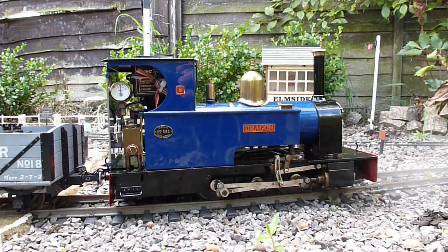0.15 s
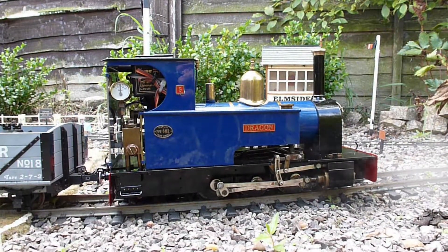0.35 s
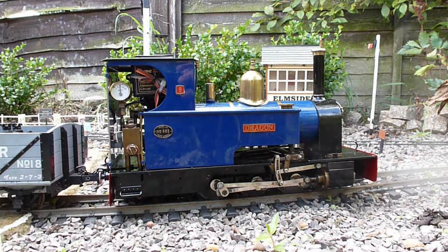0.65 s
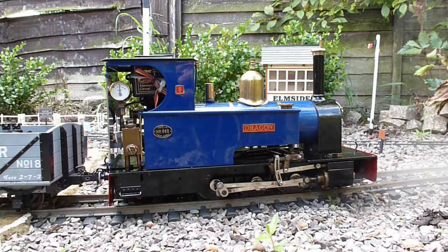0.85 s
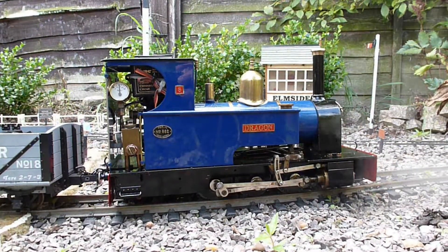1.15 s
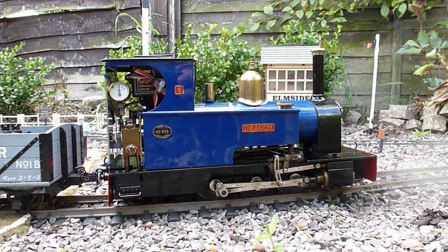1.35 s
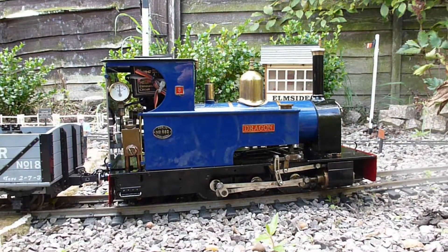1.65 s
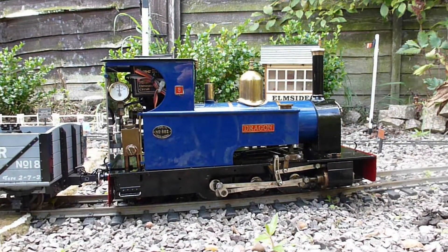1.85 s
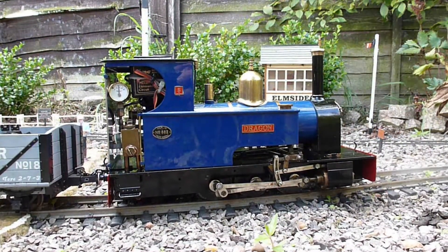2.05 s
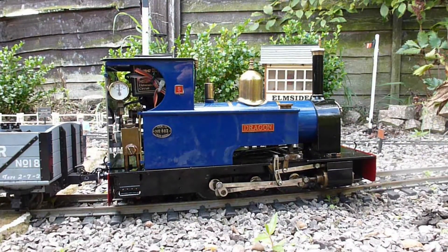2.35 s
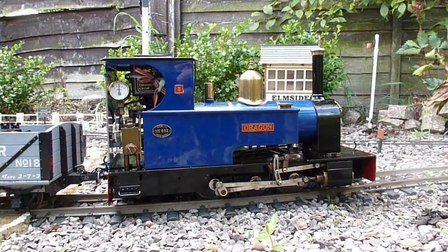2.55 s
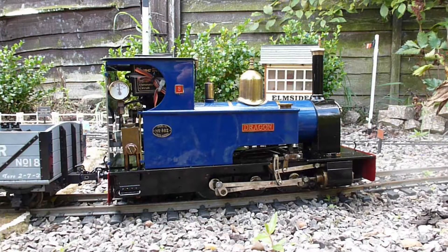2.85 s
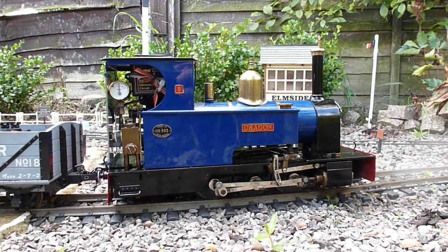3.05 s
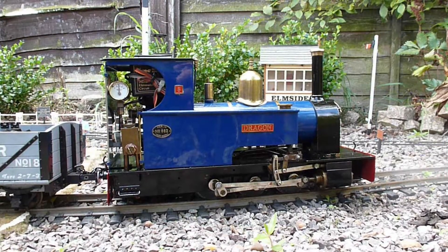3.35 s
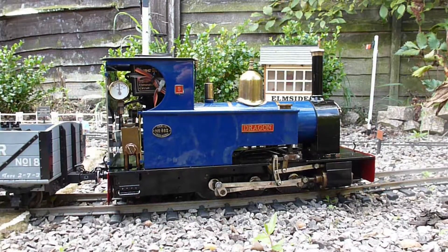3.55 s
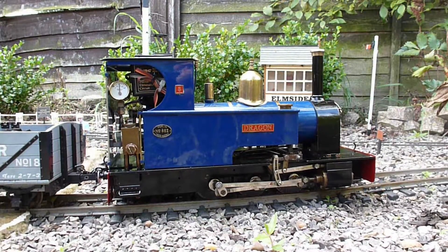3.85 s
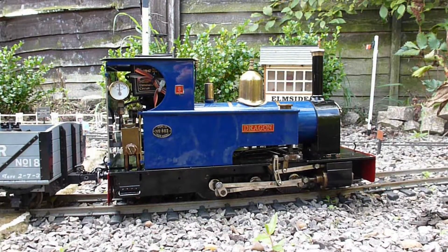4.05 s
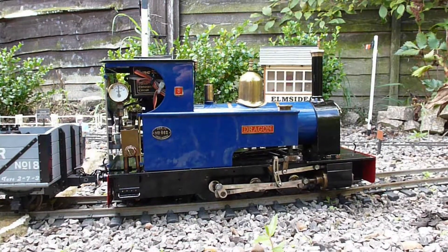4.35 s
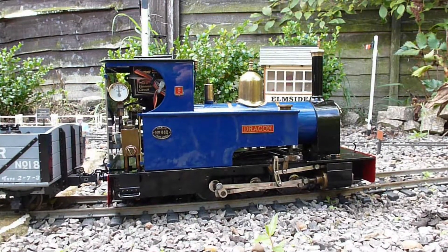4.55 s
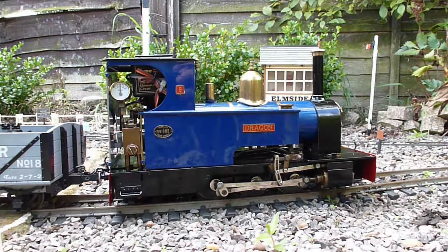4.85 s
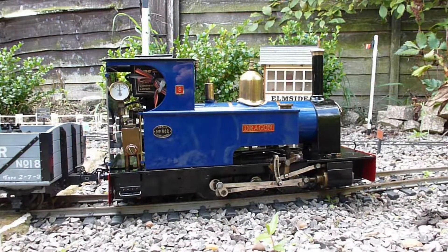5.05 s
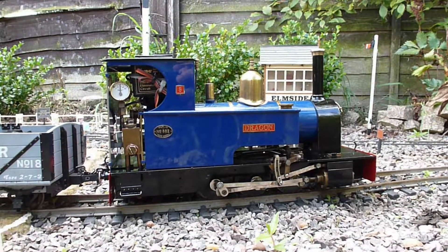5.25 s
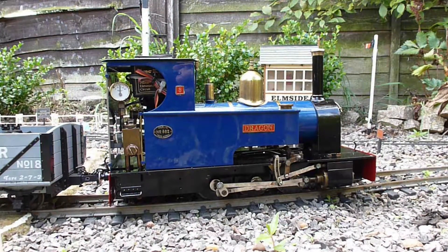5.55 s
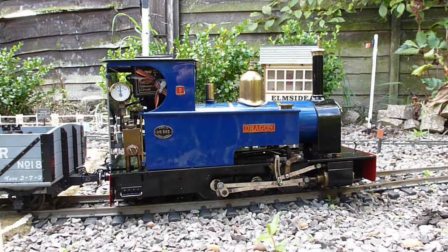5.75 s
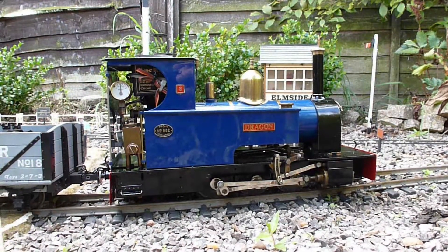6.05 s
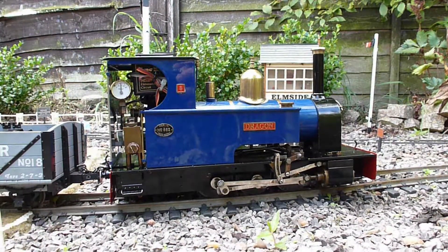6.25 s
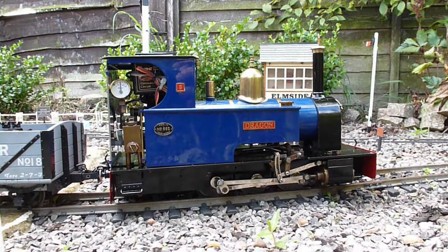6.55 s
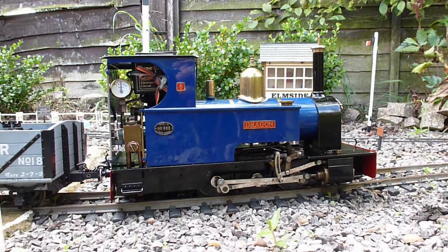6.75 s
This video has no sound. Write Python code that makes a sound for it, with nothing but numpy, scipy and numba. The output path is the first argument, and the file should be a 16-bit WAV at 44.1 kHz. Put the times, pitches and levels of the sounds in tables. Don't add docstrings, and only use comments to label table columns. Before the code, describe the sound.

Close, dry outdoor sound with faint early reflections from gravel and fence. A piercing small steam whistle opens harsh and airy, steadies briefly, weakens into an unsteady wet note, surges once more and shuts abruptly. Couplings knock twice. The burner's hollow rumble and bright leaking steam then rise as the camera adjusts, with water crackling and spitting on hot metal. A gentle steam puff swells near five seconds, the hiss later eases, and light mechanical ticks begin.

```python
import sys
import numpy as np
from scipy import signal
from scipy.fft import rfft, irfft
from scipy.io import wavfile
from scipy.ndimage import uniform_filter1d
from numba import njit

SR = 44100
rng = np.random.default_rng(int(sys.argv[2]) if len(sys.argv) > 2 else 0)


def put_to_file(sound):
    columns = np.atleast_2d(sound).T
    safe = np.clip(columns, -1, 1)
    whole_steps = np.round(safe * 32767)
    wavfile.write(sys.argv[1], SR, whole_steps.astype(np.int16))


def gain_from_db(level_db):
    decades = np.asarray(level_db, float) / 20
    return 10 ** decades


N = 304290
T = np.arange(N) / SR

BURNER_DB = -32


def noise():
    return rng.standard_normal(N)


def set_rms(x, db):
    return x * gain_from_db(db) / np.sqrt(np.mean(x ** 2))


def curve(rows):
    time_s, *columns = np.transpose(rows)
    return [uniform_filter1d(np.interp(T, time_s, column), size=200) for column in columns]


def gate(start, end, rise, fall):
    return np.clip(np.minimum((T - start) / rise, (end - T) / fall), 0, 1)


def walk(rate):
    hold = int(SR / rate)
    steps = np.repeat(rng.standard_normal(N // hold + 1), hold)
    return 1.3 * uniform_filter1d(uniform_filter1d(steps, hold), hold)[:N]


def colour(x, points):
    hz, db = np.transpose(points)
    bins = np.maximum(np.arange(N // 2 + 1) * SR / N, 1)
    return irfft(rfft(x) * gain_from_db(np.interp(np.log(bins), np.log(hz), db)), N)


@njit
def svf(x, hz, width):
    y = np.empty(len(x))
    band, low = 0., 0.
    g, damping, last_hz = 0., 0., 0.
    for i in range(len(x)):
        if hz[i] != last_hz:
            g, damping, last_hz = np.tan(np.pi * hz[i] / SR), width / hz[i], hz[i]
        v = (band + g * (x[i] - low)) / (1 + g * (g + damping))
        band = 2 * v - band
        low = low + 2 * g * v
        y[i] = damping * v
    return y


def band_pass(x, hz, width):
    return svf(x, hz + 0 * T, 1. * width)


def resonant(hiss, peaks, flicker_db):
    out = hiss
    for hz, width, db in peaks:
        out = out + gain_from_db(db + 15 + flicker_db * walk(12)) * band_pass(hiss, hz, width)
    return out


def ring(hz, t60, length=.1):
    t = np.arange(int(length * SR)) / SR
    blow = 1 - np.exp(-t / .0003)
    return -np.sin(2 * np.pi * hz * t) * blow * 1000 ** (-t / t60)


def add(out, s, wave):
    i = int(s * SR)
    out[i:i + len(wave)] += wave[:N - i]


def camera_gain_db():
    # start_s, level_db
    gain = [(0, -12), (.78, -12.5), (.86, -15), (.96, -14.5), (1.05, -6.5), (1.45, -4.5), (1.73, -8),
            (1.85, -6), (1.92, -10), (2.07, -11), (2.22, -9), (2.7, -7.5), (2.78, -13), (2.995, -13),
            (3.02, -10.5), (3.46, -4), (4.83, -.6), (6.9, .1)]
    return curve(gain)[0]


def burner():
    # pitch_hz, level_db (per Hz)
    flame_colour = [(15, -64.5), (25, -26), (74, -15.5), (134, -11.5), (193, -11.5), (283, -10.5),
                    (630, -8), (707, -9), (906, 4.5), (1040, -7), (1410, -13.5), (1870, -106), (2400, -33),
                    (3120, -44.5), (5280, -120)]
    # pitch_hz, width_hz, level_db
    flue_tones = [(84, 8, -19), (195, 13, -11),
                  (918, 37, -1), (862, 160, -11)]
    flame = set_rms(colour(noise(), flame_colour), 2.5) * gain_from_db(1.1 * walk(12))
    flue = np.zeros(N)
    for hz, width, db in flue_tones:
        tone = band_pass(noise(), hz * (1 + 0.0058 * walk(14)), width)
        flue += set_rms(tone, db) * gain_from_db(0.78 * walk(9))
    return gain_from_db(BURNER_DB + camera_gain_db()) * set_rms(flame + flue, 0)


def crackle():
    drops_per_s = 130
    drops = 1. * (rng.random(N) < drops_per_s / SR)
    drops = drops * gain_from_db(3.4 * np.minimum(rng.exponential(size=N), 3))
    knock = band_pass(svf(drops, 1200 + 200 * walk(30), 1100.), 1200, 2200)
    snap = band_pass(band_pass(drops, 3200, 3500), 3200, 4000)
    return gain_from_db(BURNER_DB + camera_gain_db()) * (set_rms(knock, -14) + set_rms(snap, -31))


def leaks():
    # pitch_hz, level_db (per Hz)
    leak_colour = [(880, -41), (1500, -1), (1850, -14), (2180, -1), (2830, -2), (3690, 4), (4510, -9.5),
                   (6350, -21), (6880, -16), (7400, -38), (9620, -66.5), (16300, -120)]
    # pitch_hz, width_hz, level_db
    leak_peaks = [(2300, 420, -7.5), (2960, 310, -3.5), (4165, 37, -6.5), (4416, 80, 0.5), (4990, 530, 6)]
    leak_db, whistle_shut_s = -46, 3.004
    cocks_shut_s, cocks_hz, cocks_width_hz, cocks_db, cocks_shut_db = 5.5, 4703, 1292.5, -6, -3.8
    puff_s, puff_peak_db, puff_fade_s = 4.93, 4., .7

    hiss = set_rms(resonant(colour(noise(), leak_colour), leak_peaks, 1.7), 0) * gain_from_db(walk(27))
    cocks = band_pass(band_pass(noise(), cocks_hz, cocks_width_hz), cocks_hz, 2 * cocks_width_hz)
    cocks = set_rms(cocks, cocks_db) * (T < cocks_shut_s)
    puff_db = puff_peak_db * gate(puff_s, 9, .03, 1) * np.exp(-np.abs(T - puff_s) / puff_fade_s)
    glands_db = leak_db + puff_db + cocks_shut_db * (T > cocks_shut_s) + camera_gain_db()
    return gain_from_db(glands_db) * (hiss + cocks) * gate(whistle_shut_s, 9, .03, 1)


def strike(modes):
    t = np.arange(int(.1 * SR)) / SR
    crack_band = signal.butter(2, [500, 4000], "band", fs=SR, output="sos")
    crack = signal.sosfilt(crack_band, rng.standard_normal(len(t)))
    body = sum(gain_from_db(db) * ring(hz, t60) for hz, db, t60 in modes)
    return body + gain_from_db(-5.) * crack * 1000 ** (-t / .012)


def couplings():
    # start_s, level_db (peak)
    clanks = [
        (3.2857, -11.5),
        (3.3353, -11.7),
    ]
    # pitch_hz, level_db, t60_s
    coupling_modes = [
        [(920, 9, 0.006), (1900, 1, 0.006), (2620, -1, 0.008), (4300, -6, 0.008), (5350, -12, 0.007),
         (7200, -17, 0.007)],
        [(530, -8, .015), (910, 7, 0.025), (1640, 6, 0.018), (2520, -12, .01), (3190, 1, 0.012),
         (5170, -9, 0.013)],
    ]
    out = np.zeros(N)
    for (s, db), modes in zip(clanks, coupling_modes):
        add(out, s, gain_from_db(db - 7) * strike(modes))
    return out


def valve_gear():
    # start_s, level_db (peak)
    ticks = [(5.83, -31), (6.2358, -22), (6.344, -28), (6.4243, -36), (6.504, -29), (6.7355, -23.5),
             (6.8962, -19)]
    # pitch_hz, level_db, t60_s
    gear_modes = [(1150, -6, .006), (2846, -3.5, 0.014), (4150, -8.5, 0.012), (5300, -12, .006)]
    # middle_s, level_db, pitch_hz, length_s, glide_share
    squeaks = [
        (3.664, -36, 1880, .018, -.03),
        (5.015, -41, 1690, .055, .012),
    ]
    out = np.zeros(N)
    for s, db in ticks:
        add(out, s, gain_from_db(db - 2) * strike(gear_modes))
    for s, db, hz, length, glide in squeaks:
        t = np.arange(int(length * SR)) / SR
        swell = np.sin(np.pi * t / length) ** 2
        tone = np.sin(2 * np.pi * hz * t * (1 + glide * t / length))
        add(out, s - length / 2, gain_from_db(db) * swell * tone)
    return out


def spits():
    # start_s, level_db (peak)
    drops = [(3.0688, -34), (3.1386, -28), (3.169, -32), (3.3004, -29), (3.3158, -29), (3.369, -32),
             (3.5118, -33), (3.5504, -28), (3.6405, -22), (3.7316, -31), (3.857, -30), (3.967, -29),
             (4.0238, -26), (4.2897, -30), (4.3394, -33), (4.612, -29), (4.79, -29), (5.0557, -28),
             (5.1077, -25), (5.132, -24), (5.239, -30), (5.4367, -27.5), (5.543, -25), (5.5817, -31),
             (5.982, -25), (5.9944, -27), (6.0495, -31), (6.207, -30), (6.4234, -29), (6.6838, -25.5)]
    metal_hz, splash_db = 1150, -8
    out = np.zeros(N)
    t = np.arange(int(.02 * SR)) / SR
    splash_band = signal.butter(2, [1500, 5800], "band", fs=SR, output="sos")
    push = np.cos(2 * np.pi * 1200 * (t - .0007)) * np.exp(-((t - .0006) / .0004) ** 2)
    for s, db in drops:
        fizz = signal.sosfilt(splash_band, rng.standard_normal(len(t))) * 1000 ** (-t / .008)
        vary_pitch, vary_splash = rng.standard_normal(2)
        metal = .25 * ring(metal_hz * (1 + .05 * vary_pitch), .014, .02)
        splash = gain_from_db(splash_db + 3 * vary_splash) * fizz
        add(out, s, gain_from_db(db + 3) * (push + metal + splash))
    return out


def valve():
    # start_s, steam_pressure (0-1)
    pressure_points = [(0, .85), (.3, 1), (.775, 1.0), (1.0, -.05), (1.4, .2), (2.69, .0), (2.795, .87),
                       (2.986, 1), (3.016, -.1)]
    # breaks_away_s, caught_again_s, catching_takes_s
    overblown = [
        (-1, .8, .1),
        (2.795, 2.995, .02),
    ]
    # middle_s, level_db, shift_hz, half_width_s (at half
    slugs = [(.045, 8, -40, .008), (.135, 9, 0, .012), (.165, -6, -30, .014), (.262, 8, 0, .008),
             (.49, 5, 0, .015), (.6, -7, -20, .01), (.65, 3, 0, .01), (.7, -7, 0, .008), (.85, 5.5, 0, .05),
             (1.0, -3, 0, .05), (1.09, -5, 0, .007), (1.12, -6, 0, .007), (1.272, -9, 0, .007),
             (1.338, -7, 0, .01), (1.41, -5, 0, .007), (1.635, 3, 40, .022), (1.782, -13, 0, .007),
             (1.875, 5, 35, .025), (2.055, 5, -30, .016), (2.09, -4, 0, .012), (2.15, 3, 18, .025),
             (2.39, -7, 0, .008), (2.435, 2.5, 24, .03), (2.53, 2.5, -15, .04), (2.755, 4.5, -10, .035),
             (2.84, 3, 0, .04), (3.001, 5.5, 0, .007)]
    slack_hz, span_hz = 2290, 210
    wet_from_s, wet_to_s, wet_fade_s = 1.0, 1.88, .07
    lock_dry, lock_wet, lock_overblown, lock_half_open = .84, .58, .24, .1
    base_note_db, wet_db, overblown_db, flutter_db = -21, -1.2, -7.8, 1.8
    base_jet_db, jet_pressure_db, wet_hiss_db = -35.2, 9., -1.0
    base_edge_db, edge_overblown_db = -40.5, 14.4
    shut_s, note_fade_db_per_s, jet_fade_db_per_s = 3.004, 2400, 1100

    pressure = curve(pressure_points)[0]
    over = sum(gate(away, caught, .008, catching) for away, caught, catching in overblown)
    wet = gate(wet_from_s, wet_to_s, wet_fade_s, wet_fade_s / 2)
    half_open = np.sin(np.pi * np.clip(pressure, 0, 1)) * (1 - wet)
    lock = lock_dry + lock_half_open * half_open
    lock = lock + wet * (lock_wet - lock)
    lock = lock + over * (lock_overblown - lock)

    surge_db, shift_hz = np.zeros((2, N))
    for s, db, shift, half in slugs:
        bump = np.hanning(int(4 * half * SR))
        add(surge_db, s - 2 * half, db * bump)
        add(shift_hz, s - 2 * half, shift * bump)
    hz = slack_hz + span_hz * pressure + shift_hz

    since_shut = np.maximum(T - shut_s, 0)
    note_db = base_note_db + wet_db * wet + overblown_db * over + surge_db
    note_db = note_db + flutter_db * (1.2 - lock) * walk(35) - note_fade_db_per_s * since_shut
    hiss_db = camera_gain_db() + wet_hiss_db * wet - jet_fade_db_per_s * since_shut
    jet_db = base_jet_db + jet_pressure_db * (pressure + over) / 2 + hiss_db
    edge_db = base_edge_db + edge_overblown_db * over + hiss_db
    return hz, lock, note_db, jet_db, edge_db


def whistle():
    # pitch_hz, level_db (per Hz)
    jet_colour = [(40, -26), (300, -17), (700, -14.5), (1100, -14), (1450, -9), (1700, -22), (2100, -18),
                  (2500, -6), (3100, -19), (4570, -16.5), (6240, -15), (7300, -20.5), (7900, -26),
                  (9000, -71.5)]
    # pitch_hz, width_hz, level_db
    jet_peaks = [(1775, 50, -5), (1975, 40, -5), (2800, 200, -5), (3275, 60, -4), (3562, 50, -2),
                 (3940, 90, -4), (4340, 120, -6), (5045, 200, -1), (5620, 150, -3), (6180, 60, -4),
                 (7190, 150, -5)]
    hz, lock, pipe_db, jet_db, edge_db = valve()
    hz = hz + 30 * (1 - lock) * np.clip((hz - 2400) / 60, 0, 1)
    waver_hz = (8 + 24 * (1 - lock)) * walk(60)
    phase = 2 * np.pi * np.cumsum(hz + waver_hz) / SR
    note = np.sqrt(2) * np.sin(phase) * gain_from_db(0.96 * walk(40))
    rung = set_rms(svf(svf(noise(), hz, 39.0), hz, 150.0), 0)
    pipe = np.sqrt(lock) * note + np.sqrt(1 - lock) * rung
    pipe = pipe / np.sqrt(0.83 + uniform_filter1d(pipe ** 2, size=220))
    pipe = pipe / np.sqrt(uniform_filter1d(pipe ** 2, int(.07 * SR)))
    overtones = gain_from_db(-31) * np.sin(2 * phase) + gain_from_db(-50) * np.sin(3 * phase)
    overtones = lock ** 3 * gain_from_db(pipe_db + 17) * overtones
    breath = set_rms(svf(svf(noise(), hz * .995, 280.0), hz, 600.), 4.2)
    jet = set_rms(resonant(colour(noise(), jet_colour), jet_peaks, 0.49), 0.88) * gain_from_db(walk(25))
    edge = set_rms(svf(noise(), 6330 + 40 * walk(3), 330.), -0.8)
    eddies = set_rms(band_pass(noise(), 1300, 600), -6)
    return gain_from_db(pipe_db) * (pipe + overtones) + gain_from_db(jet_db) * (jet + breath) + gain_from_db(edge_db) * (edge + eddies)


def scene():
    near = whistle() + spits() + couplings() + valve_gear()
    echoes = np.zeros(N)
    for delay_s, db in [(.0047, -15), (.0113, -21), (.019, -21.5), (.031, -37)]:
        echoes += gain_from_db(db) * np.roll(near, int(delay_s * SR))
    return (near + echoes + burner() + leaks() + crackle())[None]


def top_cut(x):
    return signal.sosfilt(signal.butter(12, 9070, fs=SR, output="sos"), x)


def record(dry):
    # pitch_hz, level_db
    camera_response = [(30, -1.5), (60, 2), (6000, 0), (7300, -6.5), (7700, -21), (7950, -55),
                       (8100, -46.5), (8300, -27), (8700, -34), (9100, -33), (9600, -61)]
    camera_rate_hz = 16000
    imaged = dry[0] * (1 + 2 * np.cos(2 * np.pi * camera_rate_hz * T))
    mix = colour(imaged, camera_response)[None]
    return top_cut(mix)


dry = scene()
out = record(dry)
put_to_file(out)
```